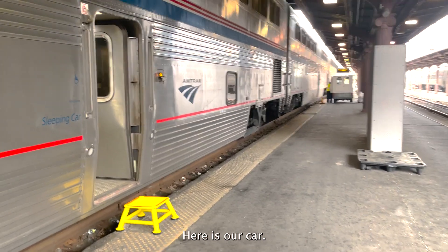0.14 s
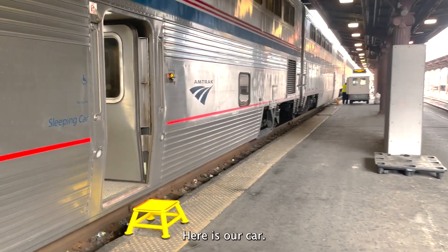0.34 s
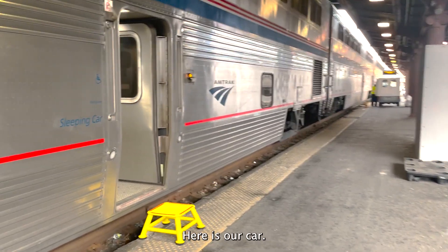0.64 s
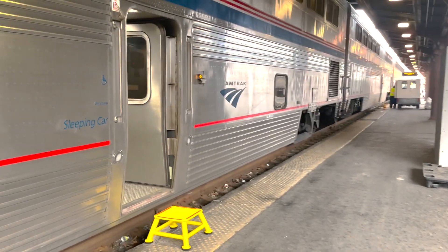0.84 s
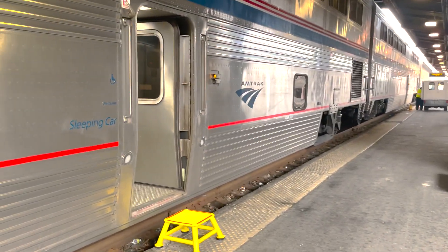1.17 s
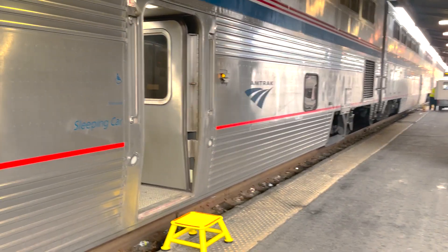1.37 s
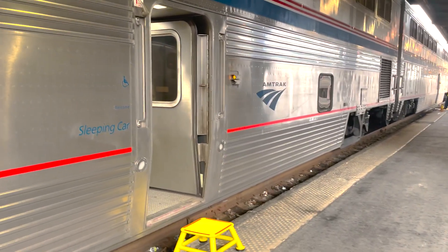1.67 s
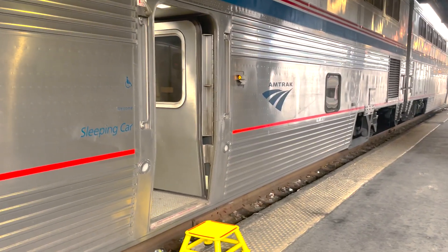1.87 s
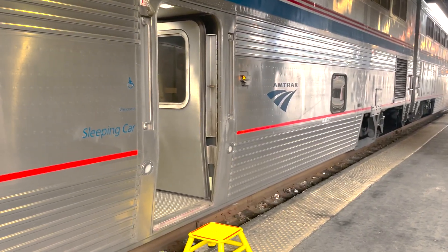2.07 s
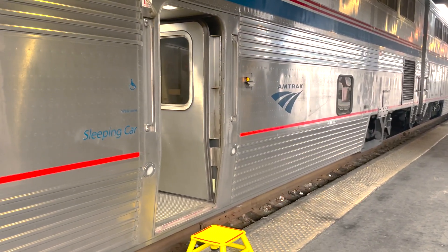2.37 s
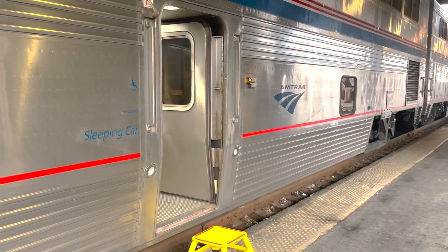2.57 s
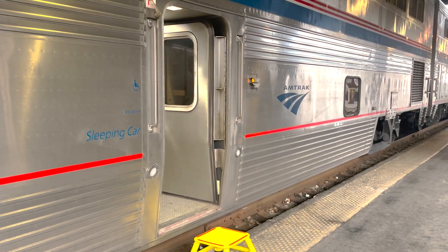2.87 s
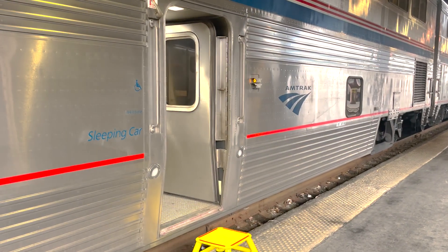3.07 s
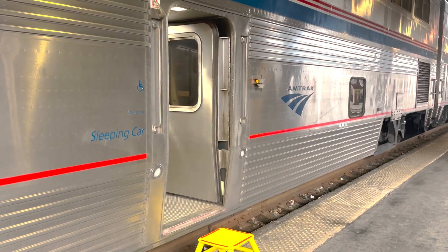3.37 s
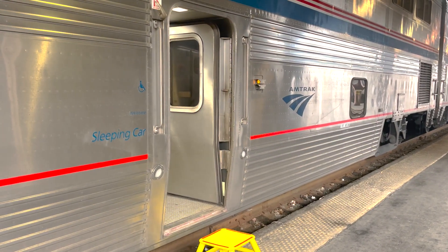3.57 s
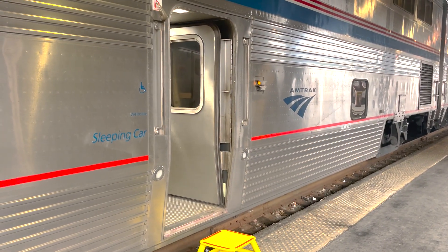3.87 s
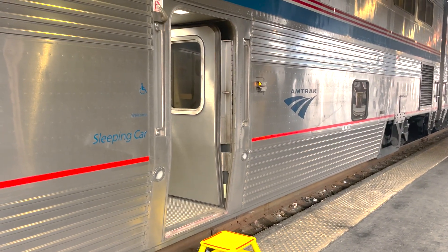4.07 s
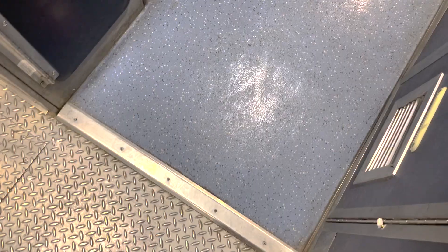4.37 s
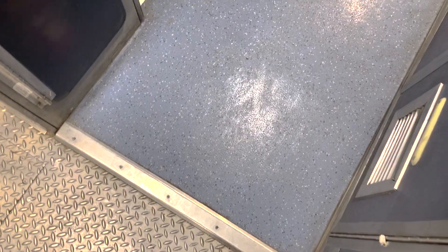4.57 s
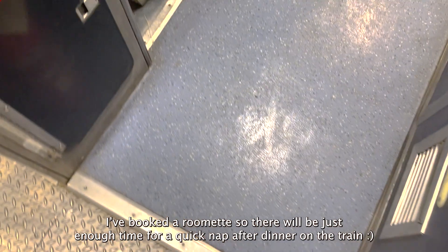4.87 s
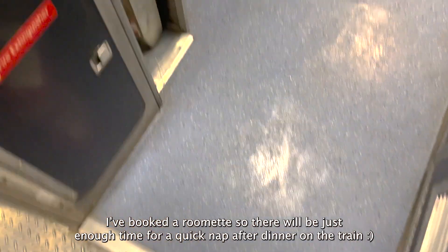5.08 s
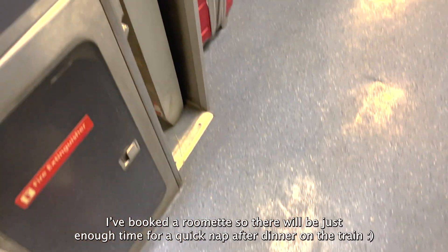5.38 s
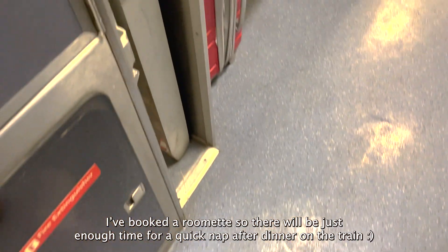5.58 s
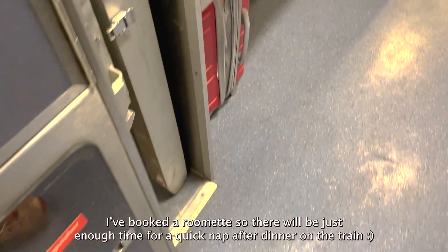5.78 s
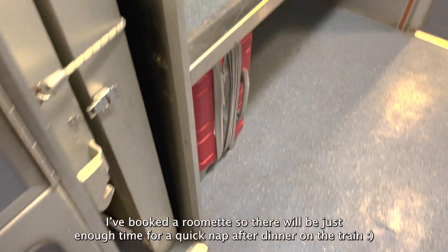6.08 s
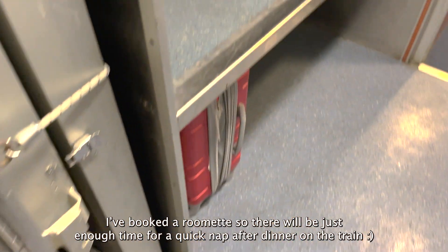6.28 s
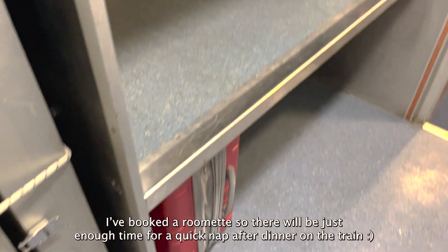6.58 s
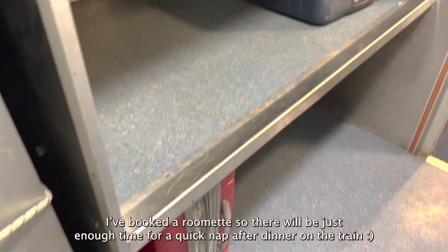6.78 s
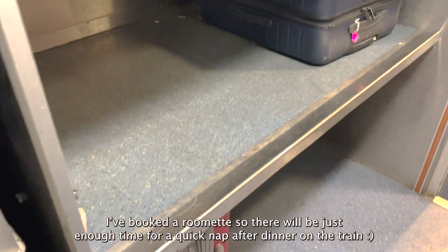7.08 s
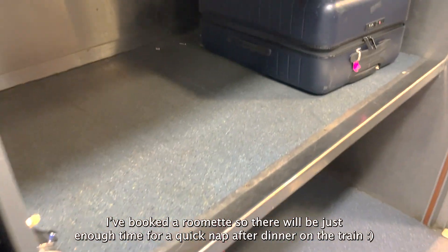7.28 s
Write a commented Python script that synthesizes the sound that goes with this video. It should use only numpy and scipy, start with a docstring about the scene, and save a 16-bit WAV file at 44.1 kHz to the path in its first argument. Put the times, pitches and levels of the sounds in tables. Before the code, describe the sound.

Loud engine drone, clanging metal and thin squeals beside a standing train, then suddenly a low ventilation hum, faint hiss, small ticks and one squeak.

```python
"""Under a station roof, beside a standing passenger train: diesel drone and fan whines in a broad roar, and a
clatter that comes in ringing surges, about five a second, with sharper bangs, panel booms, brief squeals and
swells of a fan whine. Then, abruptly, inside the carriage: low ventilation hum, blower tones passed one after
another, a thin hiss that fades away from the door, a faint whistling vent, soft knocks and one squeak. Broad
sounds are noise shaped by spectra, hums and whines are fuzzy tones; both reach two microphone ports."""
import sys
import numpy as np
from scipy import signal
from scipy.fft import rfft, irfft
from scipy.io import wavfile
from scipy.ndimage import uniform_filter1d

SR = 44100
rng = np.random.default_rng(int(sys.argv[2]) if len(sys.argv) > 2 else 0)


def bounce(signal):
    """Save signal as a 16-bit WAV file at the path given by the first command-line argument."""
    frames = np.transpose(np.atleast_2d(signal))
    limited = np.clip(frames, -1, 1)
    pcm = np.round(limited * 32767).astype(np.int16)
    wavfile.write(sys.argv[1], SR, pcm)


N = 327663
TIME = np.arange(N) / SR  # s


def gain_of(db):
    """Decibels to amplitude."""
    return 10 ** (np.asarray(db) / 20)


def evened(x):
    """Scales to rms 1."""
    return x / np.sqrt(np.mean(abs(x) ** 2) + 1e-20)


def read(points, hz, axis=1):
    """One column of a table, joined by straight lines on a log-frequency axis."""
    table = np.array(points)
    return np.interp(np.log(hz + 1), np.log(table[:, 0] + 1), table[:, axis])


def follow(curve):
    """Gain at every sample from rows (time_s, level_db)."""
    return gain_of(np.interp(TIME, *np.transpose(curve)))


def grid(size):
    """Frame times (a column) and bin frequencies (a row) of short-time spectra."""
    hop = size // 4
    frame_times = np.arange(N // hop + 2)[:, None] * hop / SR
    return frame_times, np.fft.rfftfreq(size, 1 / SR)


def patches(shape, count, size):
    """Random unevenness of rms 1, count frames long and size bins wide."""
    along_time = uniform_filter1d(rng.standard_normal(shape), count, 0)
    return evened(uniform_filter1d(along_time, size, 1))


def at_right_port(left, other, ports, hz):
    """The right port hears part of the left signal and part of another, turned by the phase lag between ports."""
    same = np.clip(read(ports, hz), 0, 1)
    lag = np.exp(-1j * read(ports, hz, axis=2))
    return (same * left + np.sqrt(1 - same ** 2) * other) * lag


def air(field, ports, left_db=0):
    """Noise at both ports, its amplitude per root Hz set by a frames x bins field; left is louder by left_db."""
    size = 2 * (field.shape[1] - 1)
    hz = np.fft.rfftfreq(size, 1 / SR)
    a, b, c, d = rng.standard_normal((4,) + field.shape)
    left = a + 1j * b
    right = at_right_port(left, c + 1j * d, ports, hz)
    pair = np.array([left * gain_of(left_db / 2), right / gain_of(left_db / 2)])
    spectra = pair * field * np.sqrt(1.5 * SR / size)
    noise = signal.istft(spectra, nperseg=size, noverlap=size * 3 // 4, time_axis=1, freq_axis=2)[1]
    return noise[:, :N]


def tone(hz, width_hz, ports, steadiness=0):
    """A fuzzy line of rms 1 whose phase wanders; steadiness 0-1 evens out its swings in size."""
    knots = np.arange(0, N / SR + 1, 1 / 2000)
    bell = np.exp(-(np.fft.fftfreq(len(knots), knots[1]) / width_hz) ** 2)

    def wander():
        """A random narrow band around zero frequency."""
        return evened(np.fft.ifft(bell * np.exp(2j * np.pi * rng.random(len(knots)))))

    left = wander()
    right = at_right_port(left, wander(), ports, np.mean(hz))
    pair = [evened(v / abs(v) ** np.clip(steadiness, 0, 1)) for v in (left, right)]
    carrier = np.exp(2j * np.pi * np.cumsum(hz * np.ones(N)) / SR)
    return np.sqrt(2) * np.array([(np.interp(TIME, knots, v) * carrier).real for v in pair])


def blow(t, start, rise, t60):
    """Amplitude that climbs for the rise time and then dies away by 60 dB in t60."""
    after_rise = np.maximum(t - start - rise, 0)
    return np.clip((t - start) / rise, 0, 1) * np.exp(-np.log(1000) * after_rise / t60)


# What the two microphone ports share on the platform: pitch_hz, coherence (0-1), left_lead (radians)
PLATFORM_PORTS = [(69.4, 1, -0.55), (232, 0.78, 0), (420, 0.36, -0.38), (620, 0.1, -2), (1500, 0.21, -3),
                  (2070, 0.75, 0.5), (2800, 0.42, 0.58), (3780, 0.45, 0.26), (5230, 0.61, 0.66),
                  (6150, 0.95, -1.5), (7540, 0.98, -3.5), (8420, 0.97, -4), (11300, 1, -6.5),
                  (14100, 1, -9.5)]
# Steady roar of engine and fans, before its trim and sink: pitch_hz, level_db (per Hz)
ROAR_SPECTRUM = [(15, -79), (30, -57), (50, -46), (68, -43), (100, -46.5), (190, -49), (410, -55),
                 (1260, -61.5), (2040, -68), (3200, -71.5), (4900, -79), (7100, -87), (9900, -95),
                 (15500, -106)]
# Strength of the diesel's drone: time_s, level_db
DRONE_LEVEL = [(0.0, -27), (0.88, -22), (2.04, -25), (2.59, -20.5), (2.83, -29), (2.87, -22.5),
               (3.66, -33.5), (3.69, -26), (4.27, -30.5)]
# Resonances that the diesel drives: pitch_hz, width_hz, level_db (against the drone)
EXHAUST_RESONANCES = [(81.4, 3.15, -1.5), (68.54, 5.9, -5.5), (111, 3.3, -14.5), (141, 6.3, -10),
                      (209.4, 8.6, -25.5)]
# Whines of fans and pumps, before the roar's trim and sink: pitch_hz, width_hz, level_db
FAN_WHINES = [(209, 1.7, -41.5), (435.5, 3.7, -38.5), (479.6, 3.9, -41.5), (725, 6.5, -43), (735, 4.5, -54),
              (842, 4.9, -46), (929, 10, -47), (1294, 52, -40), (2130, 11, -50), (2407, 19, -54),
              (2793, 12, -50), (3120, 12, -55.5), (3750, 44, -55), (5430, 114, -65), (6500, 58, -57)]
# The roar and fans hold, then sink just before the carriage
ROAR_DB, ROAR_SINK_S, ROAR_SINK_DB_PER_S = 0.44, 3.65, 6.5


def engine(flutter_db=1.4, drone_db=0):
    """Diesel drone through exhaust resonances, and fan whines in a broad, slightly uneven roar."""
    t, hz = grid(size=2048)
    uneven = patches((len(t), len(hz)), count=8, size=20)
    roar = air(gain_of(read(ROAR_SPECTRUM, hz) + flutter_db * uneven), PLATFORM_PORTS, left_db=1.26)
    drone = sum(gain_of(db) * tone(pitch, width, PLATFORM_PORTS, steadiness=0.73)
                for pitch, width, db in EXHAUST_RESONANCES)
    fans = sum(gain_of(db) * tone(pitch, width, PLATFORM_PORTS, steadiness=0.74)
               for pitch, width, db in FAN_WHINES)
    level = gain_of(ROAR_DB - ROAR_SINK_DB_PER_S * np.maximum(TIME - ROAR_SINK_S, 0))
    return level * (roar + fans) + gain_of(drone_db) * follow(DRONE_LEVEL) * drone


# Steel panels booming: start_s, pitch_hz, level_db (after the rise)
PANEL_BOOMS = [(.01, 150.6, -26), (.17, 201.8, -22.5), (.3, 233.8, -18.5), (0.399, 220.4, -26),
               (0.628, 156.6, -27), (0.699, 134.7, -21), (.89, 76, -16), (.96, 642, -26),
               (1.03, 322.4, -25), (1.244, 147.7, -19), (1.25, 306.7, -21), (1.36, 177, -21.5),
               (1.5, 276, -18.5), (1.655, 165, -21.5), (1.665, 79, -17.5), (1.9, 231, -26.5),
               (2.22, 231.3, -19.5), (2.27, 281, -26), (2.49, 250.6, -21), (2.84, 141.3, -22),
               (3.1, 232.2, -21.5), (3.11, 79, -23), (3.19, 148.6, -21.5), (3.564, 148, -17.5),
               (3.685, 73.5, -21), (3.821, 189.8, -21.5), (4.05, 248.7, -20.5)]
BOOM_RISE_S, BOOM_T60_S = 0.0066, 0.48


def booms(waver=0.155):
    """Each steel panel gives a short, low boom of unsteady pitch, alike at both ports; waver is a share of pitch."""
    size = 32768
    t, out = np.arange(size) / SR, np.zeros(N + size)
    for start, hz, db in PANEL_BOOMS:
        pitch = hz * (1 + waver * patches((size, 1), count=300, size=1)[:, 0])
        wave = np.sqrt(2) * np.sin(2 * np.pi * (np.cumsum(pitch) / SR + rng.random()))
        out[round(start * SR):][:size] += gain_of(db) * blow(t, 0, BOOM_RISE_S, BOOM_T60_S) * wave
    return out[:N]


PINGS_PER_S, PING_DB, PING_T60_S = 1000, 3.5, 0.56  # loose parts that ring briefly within the clatter


def pings(shape, frame_s):
    """A frames x bins gain in which random narrow resonances stand out and die away."""
    struck = rng.random(shape) < PINGS_PER_S * frame_s / shape[1]
    decay = np.exp(-np.log(1000) * frame_s / PING_T60_S)  # per frame
    ring = signal.lfilter([1], [1, -decay], struck, axis=0)
    return evened(np.hypot(1, gain_of(PING_DB) * ring))


# Ring of struck metal, the reference for surges and bangs: pitch_hz, level_db (per Hz)
CLASH_SPECTRUM = [(60, -74), (190, -51.5), (410, -49.5), (600, -51), (800, -49.5), (1260, -55.5),
                  (2040, -58), (3200, -62), (4900, -67.5), (7100, -69), (9900, -80), (11000, -81.5),
                  (12500, -90.5), (15500, -101)]
# Thud under a surge, before its trim: pitch_hz, level_db (per Hz)
THUD_SPECTRUM = [(50, -57), (150, -41.5), (300, -43.5), (480, -47.5), (800, -56), (2000, -70), (5000, -110)]
# Surges of clatter: start_s, level_db (against the ring), brightness_db (per octave), thud_db (against the thud)
CLATTER_SURGES = [(0.47, -4, -1.5, -11), (0.619, -8, 2, -2.5), (0.95, -3.5, 0.5, -5), (1.02, -16, -1, -9),
                  (1.236, -4, 4, -4), (1.375, -4, 2.5, -5), (1.6, -7.5, 3.5, -7.5), (1.874, -5.5, 3, -17.5),
                  (1.99, -15, 4, -33), (2.12, -7, 3, -28.5), (2.201, -3, 0.5, -4.5), (2.34, 0.5, 2, -5),
                  (2.445, -2, 1, -23), (2.565, -6.5, 3, -19), (2.751, -7.5, 0, -5.5), (2.86, 1, 0.7, -3.5),
                  (3.053, 0, 2, -3.5), (3.17, -6.5, 2.5, -6.5), (3.36, -17.5, 8.5, -23),
                  (3.534, -1.5, 1, -3.5), (3.776, -4, 2, -1.5), (4.04, -8.5, 3.5, -7)]
# Sharp metal bangs: start_s, level_db (against the ring), pitch_hz (rings most), rise_s, t60_s (at the pivot pitch)
METAL_BANGS = [(0.264, 0.5, 2000, 0.016, 1), (0.37, 5, 2500, 0.014, 0.5), (0.383, 3, 2300, 0.0033, 0.064),
               (.38, -8, 700, .012, 0.54), (0.947, -1.5, 740, 0.012, 0.5), (1.04, -5.5, 780, 0.02, 0.35),
               (1.065, -1, 1800, 0.013, 0.48), (2.372, -6, 2300, 0.019, 0.58), (2.478, 0, 2010, 0.01, 0.81),
               (3.075, -7, 850, .02, .4), (3.178, -1.5, 1900, 0.016, 0.53), (3.578, -6, 846, 0.018, 0.3),
               (4.08, -7, 8900, 0.025, 0.45)]
SURGE_RISE_S, SURGE_T60_S = 0.079, 0.95  # every surge rings alike; t60 is at the pivot pitch
THUD_DB, THUD_RISE_S, THUD_T60_S = 1.5, 0.038, 0.94
BANG_RING_DB, BANG_RING_OCTAVES = 4.5, 0.4


def clatter(pivot_hz=3000, ring_db=0.64, rattle_db=0.5, level_db=-1.0, treble_damping=0.062):
    """Surges are crowds of small metal blows on a thud, bangs are single hard ones; the station roof smears both."""
    t, hz = grid(size=512)
    octaves = np.log2(np.maximum(hz, 100) / pivot_hz)
    damping = 2 ** (-treble_damping * octaves)  # treble dies sooner
    shape, power = (len(t), len(hz)), 0

    def metal():
        """Every blow rings its own resonances."""
        return read(CLASH_SPECTRUM, hz) + ring_db * patches((1, len(hz)), count=1, size=2)

    for start, db, bright, thud_db in CLATTER_SURGES:
        clash = gain_of(metal() + db + bright * octaves)
        clash = clash * blow(t, start, SURGE_RISE_S, SURGE_T60_S * damping)
        thud = gain_of(read(THUD_SPECTRUM, hz) + THUD_DB + thud_db)
        thud = thud * blow(t, start, THUD_RISE_S, THUD_T60_S)
        power = power + clash ** 2 + thud ** 2
    for start, db, pitch, rise, t60 in METAL_BANGS:
        peak = np.exp(-(np.log2((hz + 1) / pitch) / BANG_RING_OCTAVES) ** 2)
        bang = gain_of(metal() + db + BANG_RING_DB * peak)
        power = power + (bang * blow(t, start, rise, t60 * damping)) ** 2
    rattle = gain_of(level_db + rattle_db * patches(shape, count=4, size=90))
    return air(rattle * pings(shape, t[1, 0]) * np.sqrt(power), PLATFORM_PORTS, left_db=1.0)


# Brief squeals of metal, and swells of a fan whine near 2.79 kHz: start_s, length_s, pitch_hz, level_db (before
# the swell and fade)
SQUEALS_AND_WHINES = [(0.268, .17, 2790, -34.5), (0.54, 0.31, 10800, -53), (.98, .16, 2800, -39),
                      (1.28, 0.26, 10900, -60), (2.02, 0.2, 4150, -45), (3.3, 0.41, 2780, -40.5),
                      (3.45, 0.11, 1890, -38), (3.743, 0.09, 1840, -34), (3.836, 0.18, 7520, -48),
                      (3.85, 0.2, 12200, -55), (3.91, 0.21, 2975, -36.5), (4.09, 0.11, 10850, -54),
                      (4.212, 0.1, 2795, -38)]
SQUEAL_RISE_S, SQUEAL_CATCH_DB = 0.034, 1.5
SQUEAL_WIDTH, SQUEAL_WAVER = 0.016, 0.005  # shares of the pitch


def squeals_and_whines():
    """Brief squeals and swells of a fan whine: each sounds thinly about one pitch, its pitch and level wavering
    together, and fades."""
    out = 0
    for start, length, hz, db in SQUEALS_AND_WHINES:
        fade = np.sqrt(np.clip((start + length - TIME) / length, 0, 1))
        swell = np.clip((TIME - start) / SQUEAL_RISE_S, 0, 1) * fade
        grip = patches((N, 1), count=900, size=1)[:, 0]
        catch = evened(gain_of(SQUEAL_CATCH_DB * grip))
        pitch = hz * (1 + SQUEAL_WAVER * grip)
        line = tone(pitch, SQUEAL_WIDTH * hz, PLATFORM_PORTS, steadiness=0.5)
        out = out + gain_of(db) * swell * catch * line
    return out


def loose_metal(low_hz=700, high_hz=3000, ring_db=11.0, t60=1.0, count=20):
    """Every surge sets a few loose parts ringing, each at its own pure pitch and its own place left to right."""
    size = 24000
    t, out = np.arange(size) / SR, np.zeros((2, N + size))
    for start, db, _, _ in CLATTER_SURGES:
        pitch, phase, left, right = rng.random((count, 4)).T
        hz = (np.sqrt(low_hz) + pitch * (np.sqrt(high_hz) - np.sqrt(low_hz))) ** 2
        angle = 2 * np.pi * (hz[:, None] * t + phase[:, None])
        modes = np.sin(angle.astype(np.float32))
        level = np.sqrt(2) * gain_of(read(CLASH_SPECTRUM, hz) + db + ring_db)
        gains = level * (.5 + np.array([left, right]))
        out[:, round(start * SR):][:, :size] += gains @ modes * blow(t, 0, SURGE_RISE_S, t60)
    return out[:, :N]


# What the two microphone ports share in the carriage: pitch_hz, coherence (0-1), left_lead (radians)
CARRIAGE_PORTS = [(220, .99, 0), (450, .75, 0), (800, .15, -.2), (1900, .55, 0), (3000, .4, -.7),
                  (3600, .1, 0), (5000, .15, 0), (6200, .7, 1.6), (8800, .82, 2.4), (9900, 1, 3.1),
                  (13000, 1, 3.2), (15500, .8, 4.3)]
# Air in the carriage: pitch_hz, level_db (per Hz)
CABIN_SPECTRUM = [(20, -85), (30, -66.5), (44, -59.5), (70, -52), (105, -52.5), (160, -70.5), (220, -63.5),
                  (300, -75), (440, -74), (900, -81), (1500, -88.5), (2500, -91.5), (6500, -99),
                  (15500, -104)]
# Hiss at the carriage door, before its trim and fade: pitch_hz, level_db (per Hz)
DOOR_SPECTRUM = [(100, -87), (350, -68), (800, -79.5), (1500, -91), (2300, -89.5), (3500, -95.5),
                 (6500, -97), (8000, -95.5), (9000, -96), (10900, -96), (12000, -92), (13300, -94),
                 (15500, -91.5)]
# Ventilation hums: pitch_hz, width_hz, level_db
VENT_HUMS = [(42, 3.3, -41.5), (52.4, 5.6, -40.5), (94.9, 4.8, -40), (119.4, 9.6, -47), (195.7, 3, -53.5),
             (220, 3, -61), (359.5, 13, -59.5), (439, 8, -60), (503, 6, -61.5), (788, 3, -69),
             (926, 2.7, -74), (650, 4, -65.5), (995, 4, -69.5), (4200, 280, -71)]
# Blowers passed along the corridor: nearest_s, reach_s (to fall by 3 dB), pitch_hz, level_db (when nearest)
PASSED_BLOWERS = [(4.65, 0.95, 239.5, -46.5), (4.75, 0.3, 699, -51.5), (4.9, .5, 465, -57),
                  (6.85, 0.1, 444.5, -52), (7.3, 0.55, 464, -48.5), (7.2, 1.5, 756, -62.5)]
# The hiss holds in the doorway, then falls behind
DOOR_DB, LEAVE_DOOR_S, DOOR_FADE_DB_PER_S = 0.5, 4.74, 5


def ventilation(flutter_db=1.5, blower_width_hz=3):
    """Duct rumble and blower tones that swell as they are passed; the hiss of the doorway falls behind."""
    t, hz = grid(size=2048)
    door_fade = DOOR_FADE_DB_PER_S * np.maximum(t - LEAVE_DOOR_S, 0)
    door = gain_of(read(DOOR_SPECTRUM, hz) + DOOR_DB - door_fade)
    cabin = gain_of(read(CABIN_SPECTRUM, hz))
    uneven = gain_of(flutter_db * patches((len(t), len(hz)), count=8, size=16))
    out = air(np.hypot(cabin, door) * uneven, CARRIAGE_PORTS, left_db=0.0)
    for pitch, width, db in VENT_HUMS:
        out += gain_of(db) * tone(pitch, width, CARRIAGE_PORTS, steadiness=0.31)
    for nearest, reach, pitch, db in PASSED_BLOWERS:
        distance = np.hypot(1, (TIME - nearest) / reach)  # 1 when nearest
        out += gain_of(db) / distance * tone(pitch, blower_width_hz, CARRIAGE_PORTS, steadiness=0.77)
    return out


def grille(hz=2880, width_hz=210, level_db=-65, flutter_db=3.5):
    """Air whistles faintly and unevenly through a vent."""
    flutter = gain_of(flutter_db * patches((N, 1), count=2600, size=1)[:, 0])
    return gain_of(level_db) * flutter * tone(hz, width_hz, CARRIAGE_PORTS, steadiness=.3)


# Knocks and ticks in the carriage: start_s, level_db (per Hz at the centre), pitch_hz (centre), width_octaves,
# rise_s, t60_s
CARRIAGE_KNOCKS = [(4.81, -90, 4000, 0.48, .01, 0.52), (4.915, -72.5, 599, 1.1, 0.02, 0.3),
                   (5.17, -66, 209, .3, 0.013, .25), (5.385, -64, 230, 0.84, 0.012, .15),
                   (5.78, -47, 107, 0.3, 0.037, 0.77), (5.925, -88, 5400, .08, .02, .3),
                   (6.094, -76.5, 4480, 0.034, .002, 0.16), (6.114, -82, 3200, .45, .003, 0.15),
                   (6.165, -84, 3200, .3, .003, .15), (6.21, -83, 3100, .12, .003, .1),
                   (6.335, -83, 2900, .15, .004, .15), (6.462, -86, 3300, .4, .003, .15),
                   (6.49, -83, 3070, 0.23, .003, .22), (6.684, -81, 2300, .3, .002, .06),
                   (6.71, -65, 260, 0.76, .01, 0.2), (6.735, -93, 6300, .1, .01, .2),
                   (7.25, -82, 2700, 0.16, .004, 0.194), (7.315, -67, 300, 0.77, 0.011, .15)]


def knocks(rattle_db=1.0):
    """Soft footfalls and small fittings, each rattling in one damped band of noise."""
    size = 32768
    t, hz = np.arange(size) / SR, np.fft.rfftfreq(size, 1 / SR)
    same, out = np.clip(read(CARRIAGE_PORTS, hz), 0, 1), np.zeros((2, N + size))
    for start, db, pitch, width, rise, t60 in CARRIAGE_KNOCKS:
        left, other = rfft(rng.standard_normal((2, size))) * np.sqrt(SR / 2)
        right = same * left + np.sqrt(1 - same ** 2) * other
        band = np.exp(-.5 * (np.log2((hz + 1) / pitch) / width) ** 2)
        noise = irfft(band * np.array([left, right]))
        rattle = gain_of(rattle_db * patches((size, 1), count=200, size=1)[:, 0])
        out[:, round(start * SR):][:, :size] += gain_of(db) * blow(t, 0, rise, t60) * rattle * noise
    return out[:, :N]


# Path of the squeak: time_s, pitch_hz, level_db
SQUEAK_PATH = [(5.255, 4260, -71), (5.275, 4310, -61), (5.335, 4390, -60), (5.365, 4430, -66),
               (5.397, 4790, -60), (5.415, 4850, -78), (5.47, 4870, -78), (5.517, 4840, -60),
               (5.54, 4470, -76), (5.565, 4220, -61), (5.585, 4184, -78)]


def squeak(width_hz=55):
    """A thin rubbing squeak that glides up, hangs and drops."""
    time_s, hz, db = np.transpose(SQUEAK_PATH)
    level = np.interp(TIME, time_s, gain_of(db), left=0, right=0)
    return level * tone(np.interp(TIME, time_s, hz), width_hz, CARRIAGE_PORTS, steadiness=1)


CUT_S = 4.279  # from the platform to the carriage


def scene():
    """The platform, then at once the carriage."""
    platform = engine() + booms() + clatter() + squeals_and_whines() + loose_metal()
    carriage = ventilation() + grille() + knocks() + squeak()
    inside = np.clip((TIME - CUT_S) / 0.0034 + .5, 0, 1)  # a 3.4 ms crossfade
    return (1 - inside) * platform + inside * carriage


EDGE_HZ = 15750


def record(dry):
    """The band limit of the recorder: a steep low-pass filter."""
    low_pass = signal.firwin(511, EDGE_HZ, window=("kaiser", 9), fs=SR)
    return signal.oaconvolve(dry, low_pass[None], "same")


dry = scene()
out = record(dry)
bounce(out)
```